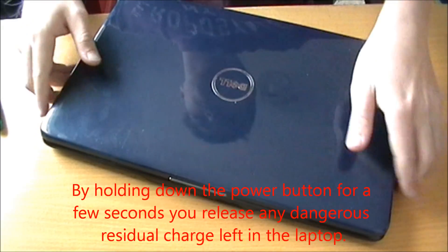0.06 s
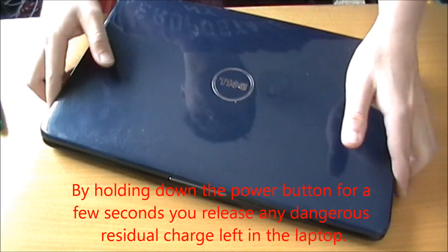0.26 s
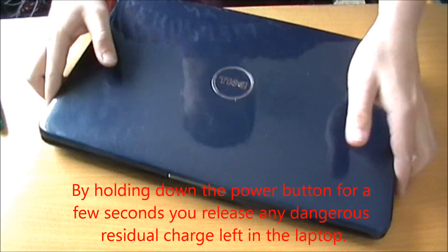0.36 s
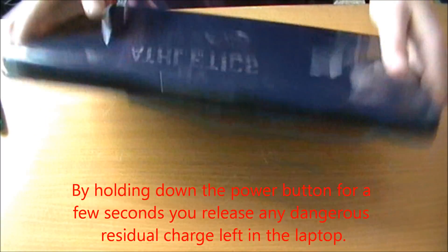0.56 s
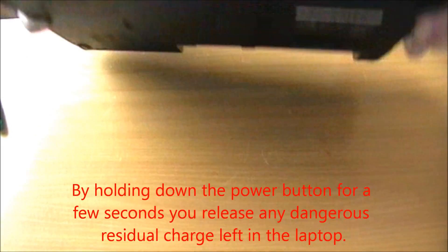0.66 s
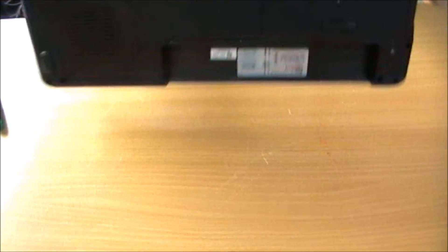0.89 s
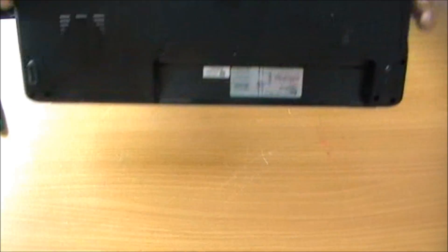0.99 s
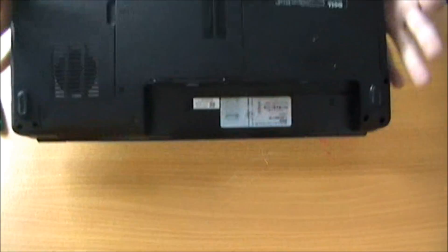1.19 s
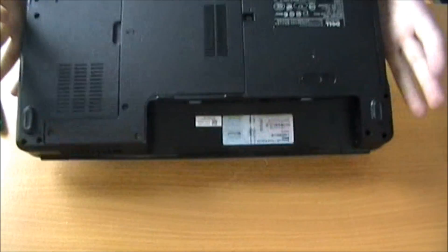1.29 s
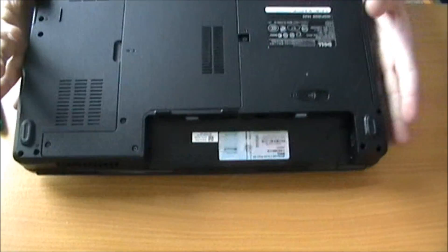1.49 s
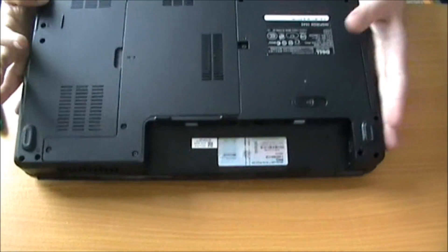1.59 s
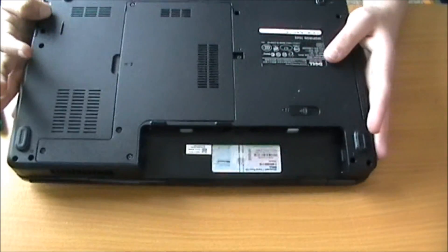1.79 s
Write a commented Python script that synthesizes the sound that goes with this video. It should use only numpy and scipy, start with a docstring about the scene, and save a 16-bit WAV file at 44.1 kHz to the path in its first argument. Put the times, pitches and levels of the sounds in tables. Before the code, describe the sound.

Plastic laptop knocking, creaking and clacking as it is turned over on a wooden table.

```python
"""A faint scrape and hollow knocks: a closed plastic laptop is gripped and slid on a wooden table,
close to the microphone in a small, quiet room. It tips up and its edge bumps the table, ringing
the wood and shaking loose panels. As it is turned over and lowered, hands rub, the shell creaks
in stick-slip ticks and fingers squeak and tap softly. It lands with two sharp plastic clacks."""
import sys
import numpy as np
from scipy import signal
from scipy.fft import rfft, irfft, next_fast_len
from scipy.io import wavfile
from scipy.ndimage import uniform_filter1d

SR = 44100
rng = np.random.default_rng(int(sys.argv[2]) if len(sys.argv) > 2 else 0)


def dump_mix(stems):
    """Bounce the given channels to the path in sys.argv[1] as a 16-bit WAV at rate SR."""
    frames = np.atleast_2d(stems).T  # one column per channel
    limited = np.clip(frames, -1, 1)  # hard clip at full scale
    pcm = np.round(limited * 32767).astype(np.int16)
    wavfile.write(sys.argv[1], SR, pcm)


N = 81585
RING_T = np.arange(SR // 2) / SR
EDGES = 25 * 2 ** (np.arange(30) / 3)   # third-octave bands, Hz
CENTRES = np.sqrt(EDGES[1:] * EDGES[:-1])
BANK = [signal.butter(2, pair, "band", fs=SR, output="sos") for pair in zip(EDGES, EDGES[1:])]
CUTOFF_HZ = 16200


def from_db(db):
    """Decibels to gain."""
    return 10 ** (np.asarray(db) / 20)


def at_hz(points, hz):
    """Read an EQ curve on a log-frequency axis."""
    f, value = np.transpose(points)
    return np.interp(np.log(hz), np.log(f), value)


def unit(x):
    """Scale to energy 1."""
    return x / np.sqrt(np.sum(x ** 2) + 1e-20)


def low_cut(x, hz):
    """Roll off the bass at 12 dB per octave."""
    return signal.sosfilt(signal.butter(2, hz, "high", fs=SR, output="sos"), x)


def envelope(t, t60, rise):
    """A quick attack, then an exponential decay."""
    attack = np.minimum(t / rise, 1) ** 2
    return attack * np.exp(-np.log(1000) * np.maximum(t - rise, 0) / t60) + 1e-12


def add(out, s, sound):
    """Mix a sound in at s seconds."""
    start = int(s * SR)
    out[start:start + len(sound)] += sound[:N - start]


def coloured(pair, colour, tilt_db=0):
    """Deal two noises to alternate bands and set their levels; the tilt pivots at 4 kHz."""
    gains = from_db(at_hz(colour, CENTRES) + tilt_db * np.log2(CENTRES / 4000)) / np.sqrt(3)
    return sum(gains[k] * unit(signal.sosfilt(sos, pair[k % 2])) for k, sos in enumerate(BANK))


def burst(colour, t60, rise, tilt_db=0):
    """Many close modes struck at once, as decaying noise; levels count as if packed into 10 ms."""
    t = RING_T[:SR // 4]
    noises = rng.standard_normal((2, len(t))) * envelope(t, t60, rise)
    return np.sqrt(SR / 100) * coloured(noises, colour, tilt_db)


def ring(modes, contact_hz, vary_db=1.5):
    """One blow on a set of modes; a soft contact spares the high ones."""
    out = 0
    for hz, db, t60 in modes:
        gain = from_db(db + vary_db * rng.standard_normal()) / (1 + (hz / contact_hz) ** 2)
        out += gain * np.sin(2 * np.pi * hz * RING_T) * envelope(RING_T, t60, rise=1 / SR)
    return out


def blows(hits, modes, rattle, rattle_t60, rise_s, crack_db, hard_contact_hz=2470):
    """Each blow rings the body, cracks at first contact and shakes the loose panels."""
    out = np.zeros(N)
    for s, db, contact_hz, rattle_db in hits:
        hardness = min(contact_hz / hard_contact_hz, 1)
        body = ring(modes, contact_hz) * np.minimum(RING_T / rise_s, 1)
        crack = hardness * burst(rattle, t60=0.0081, rise=0.00024)
        add(out, s, -from_db(db) * body)
        add(out, s, from_db(rattle_db + crack_db) * crack)
        add(out, s, from_db(rattle_db) * burst(rattle, rattle_t60, rise_s))
    return out


def friction(fader, colour, grains_per_s, grain_db):
    """Dense tiny catches of uneven size under a level curve."""
    catches = rng.random(N) < grains_per_s / SR
    sizes = from_db(grain_db * np.minimum(rng.exponential(1, N), 4))
    grains = catches * sizes * rng.choice([-1, 1], (2, N)) + 1e-12
    texture = unit(coloured(grains, colour)) * np.sqrt(N)
    return texture * from_db(np.interp(np.arange(N) / SR, *np.transpose(fader)))


# Still air of the room: f/Hz, octave level/dB
ROOM_TONE_COLOUR = [(25, -99), (50, -101), (80, -70.5), (140, -70.5), (280, -70.5), (450, -75),
                    (1000, -69.5), (2500, -76.5), (5000, -71.5), (9000, -81.5), (16000, -75)]


def room_tone(drone_hz=285, width_hz=14.5, drone_db=-68.5):
    """A quiet bed of noise with a faint, steady drone."""
    resonance = signal.iirpeak(drone_hz, drone_hz / width_hz, fs=SR)
    drone = unit(signal.lfilter(*resonance, rng.standard_normal(N)))
    air = coloured(rng.standard_normal((2, N)), ROOM_TONE_COLOUR)
    return np.sqrt(N) * (air + from_db(drone_db) * drone)


# Fader ride of the slide: t/s, level/dB
SLIDE_FADER = [(0, -58), (.04, -61), (.08, -78), (.13, -76), (.18, -54.5), (.22, -70), (.345, -63),
               (.375, -42.5), (.41, -49.5), (.44, -48.5), (.49, -48), (.52, -59.5), (.57, -58),
               (.62, -66.5), (.7, -69)]
# Scrape of plastic on wood: f/Hz, octave level/dB
SLIDE_COLOUR = [(30, -37), (70, -17), (140, -7), (300, -3.5), (650, -15.5), (1200, 0), (2000, -4),
                (4200, -1.5), (8500, -5), (11500, -17), (16000, -21)]


def slide():
    """The laptop catches finely on the wood as it slides."""
    return friction(SLIDE_FADER, SLIDE_COLOUR, grains_per_s=4500, grain_db=3)


# Knock cues: t/s, ring level/dB, contact cut-off/Hz, rattle level/dB
KNOCK_CUES = [(0.0974, -16, 1790, -10.5), (0.158, -16.5, 150, -21), (0.2209, 2.5, 3000, 1.5),
              (0.3495, -20.5, 1500, -24), (0.471, -22, 1200, -16), (0.52, -14.5, 131, -23)]
# Resonances of the case lying on the table: f/Hz, level/dB, t60/s
CASE_MODES = [(156, -48.5, 0.86), (198.6, -31.5, 0.37), (239.5, -24.5, 0.21), (288, -14, 0.048),
              (331.5, -32, 0.24), (409, -30.5, 0.16), (571.4, -33.5, 0.096), (619, -47, 0.35),
              (797, -30, 0.051), (1236, -30.5, 0.034), (3360, -40, .05), (3900, -45, .1)]
# Its loose panels: f/Hz, octave level/dB
CASE_RATTLE = [(30, -78), (80, -58), (250, -55), (500, -34), (900, -40.5), (1800, -46.5), (3500, -42),
               (8000, -48.5), (11000, -57.5), (16000, -66)]


def grip_knocks():
    """The gripped case knocks and rattles, radiating little bass."""
    knocks = blows(KNOCK_CUES, CASE_MODES, CASE_RATTLE, rattle_t60=0.22, rise_s=0.0023, crack_db=0.5)
    return low_cut(knocks, hz=175)


# Tick cues: t/s, level/dB, tilt/(dB per octave)
TICK_CUES = [(0.3491, -0.5, -4), (0.446, -3, 0.5), (0.4707, 2.5, -1), (0.476, -6, 0), (0.549, -11.5, -5.5),
             (0.656, 5, -6), (0.829, -3, -4.5), (0.839, -10.5, 5), (0.8732, -1.5, 2.5), (0.898, -8, 8.5),
             (0.9038, -3.5, 0.5), (0.9154, -3.5, 0), (0.930, -5, 5.5), (0.9387, -8.5, 2),
             (0.9466, -3, -0.5), (0.954, -11.5, 6), (0.9601, -6, -4), (0.964, -3, 3.5), (0.9839, -1.5, 1),
             (1.039, -0.5, 1), (1.054, -4, -1.5), (1.063, -11.5, 7.5), (1.0852, 2, 1.5), (1.113, -9, -6),
             (1.204, -7.5, 3), (1.296, -7.5, -1), (1.498, -21.5, 10)]
# Thin snap of one slip: f/Hz, octave level/dB
TICK_COLOUR = [(40, -103), (200, -72), (800, -57), (1200, -54), (1900, -52.5), (3000, -51.5), (4700, -44.5),
               (8000, -48.5), (11000, -58), (16000, -62)]


def shell_creak():
    """The shell sticks and slips in dry ticks that crowd into a creak."""
    out = np.zeros(N)
    for s, db, tilt_db in TICK_CUES:
        add(out, s, from_db(db) * burst(TICK_COLOUR, t60=0.028, rise=0.00066, tilt_db=tilt_db))
    return out


# Bump cues: t/s, ring level/dB, contact cut-off/Hz, rattle level/dB
BUMP_CUES = [(0.6382, 2, 3000, 0), (0.676, -6, 1110, -1), (0.699, -11, 900, -11), (0.7285, 4.5, 198, -4),
             (0.745, -18, 500, -11), (0.772, -27, 700, -18)]
# Resonances of the table top with the laptop on edge: f/Hz, level/dB, t60/s
TABLE_MODES = [(87, -60, 0.087), (138, -27.5, 0.29), (181, -32.5, .16), (260.2, -31, 0.22),
               (357, -31, 0.18), (405.3, -30.5, 0.15), (494.6, -36, 0.31), (601.6, -42, .25),
               (720, -50, 0.4), (792.6, -36, 0.067), (794, -33.5, 0.15), (1153, -34.5, 0.14),
               (1336, -49, 0.33), (1694, -42.5, 0.31)]
# Clatter of a bump: f/Hz, octave level/dB
BUMP_RATTLE = [(28, -79), (55, -62), (110, -40), (250, -31), (500, -35.5), (1100, -35), (2200, -42.5),
               (4000, -43), (7500, -50.5), (11000, -62), (16000, -67)]


def edge_bumps():
    """The laptop's edge strikes the table: a quick run of woody, rattling thumps."""
    bumps = blows(BUMP_CUES, TABLE_MODES, BUMP_RATTLE, rattle_t60=0.14, rise_s=0.002, crack_db=-2)
    return low_cut(bumps, hz=60)


# Fader ride of the hands: t/s, level/dB
RUB_FADER = [(.72, -100), (.8, -67), (.85, -54.5), (.92, -54.5), (.98, -60), (1.03, -58), (1.1, -62),
             (1.23, -63.5), (1.29, -58.5), (1.36, -66), (1.47, -72), (1.54, -64), (1.61, -77), (1.7, -63),
             (1.77, -64), (1.85, -60.5)]
# Brush of skin on plastic: f/Hz, octave level/dB
RUB_COLOUR = [(30, -28), (100, -11), (400, -6.5), (900, 3.5), (2000, 4), (4500, -4), (8000, -7),
              (16000, -16)]


def hand_rub():
    """Hands drag over the case with a soft, grainy midrange."""
    return friction(RUB_FADER, RUB_COLOUR, grains_per_s=3000, grain_db=3.5)


# Squeak and soft tap cues: t/s, level/dB, f/Hz
BLIP_CUES = [(0.827, -45, 1228), (0.89, -43.5, 1270), (0.9593, -33, 1910), (1.277, -53.5, 875),
             (1.771, -50.5, 908), (1.801, -55, 940), (1.841, -56, 920)]


def squeaks_and_taps(pitch_wander=0.13):
    """Finger squeaks and soft taps on the plastic: short blips of unsteady pitch."""
    out = np.zeros(N)
    for s, db, hz in BLIP_CUES:
        wander = uniform_filter1d(rng.standard_normal(len(RING_T)), size=40)
        pitch_hz = hz * (1 + pitch_wander * wander / wander.std())
        tone = np.sin(2 * np.pi * np.cumsum(pitch_hz) / SR)
        add(out, s, 2 * from_db(db) * tone * envelope(RING_T, t60=0.024, rise=0.002))
    return out


# Clack cues: t/s, level/dB, rise/s, crack tilt/(dB per octave), crack t60/s, after-ring/dB, shell/dB
CLACK_CUES = [(1.1295, 0, 0.001618, 0, 0.018, -17.5, 0), (1.6233, -10, 0.00027, .2, 0.017, 0.5, -8)]
# Hard crack of the landing: f/Hz, octave level/dB
CLACK_COLOUR = [(30, -100), (130, -59), (300, -50.5), (700, -35.5), (1300, -41), (2000, -30), (3400, -33.5),
                (5000, -38.5), (7500, -32), (11000, -46), (16000, -43)]
# Its bright tail: f/Hz, octave level/dB
AFTER_RING_COLOUR = [(40, -99), (200, -65), (600, -35), (1200, -45), (2200, -41), (3600, -28),
                     (7500, -30.5), (11000, -50), (16000, -56)]
# Resonances of the plastic shell: f/Hz, level/dB, t60/s
SHELL_MODES = [(836, -36, .045), (1688, -34, 0.046), (1972, -28, .018), (2050, -33, .04),
               (3263, -33.5, 0.023), (3768, -39, .12), (6750, -48, .06)]


def landing_clacks():
    """Hard plastic lands: a crack, a bright after-ring and the shell's modes."""
    out = np.zeros(N)
    for s, db, rise, tilt_db, t60, after_db, shell_db in CLACK_CUES:
        crack = burst(CLACK_COLOUR, t60, rise, tilt_db)
        after_ring = from_db(after_db) * burst(AFTER_RING_COLOUR, t60=0.13, rise=rise)
        add(out, s, from_db(db) * (crack + after_ring))
        add(out, s + rise, from_db(db + shell_db) * ring(SHELL_MODES, contact_hz=CUTOFF_HZ))
    return out


# EQ of the reflected sound: f/Hz, level/dB
REVERB_EQ = [(60, -17), (200, -15), (600, -6), (2000, -7), (6000, -6), (16000, -8)]


def reverb(x):
    """Diffuse reflections of the small room, with one short decay for all bands."""
    noises = rng.standard_normal((2, len(RING_T))) * envelope(RING_T, t60=0.27, rise=0.0035)
    band_shares = np.sqrt(2 * np.diff(EDGES) / SR)
    gains = band_shares * from_db(at_hz(REVERB_EQ, CENTRES))
    tail = sum(gains[k] * unit(signal.sosfilt(sos, noises[k % 2])) for k, sos in enumerate(BANK))
    return signal.fftconvolve(x, tail)[:N]


# Width of the scattered sound: f/Hz, side over mid/dB
SCATTER_WIDTH = [(60, -7), (300, -12), (650, -4.5), (1300, -12.5), (2800, -10.5), (5500, -39),
                 (9000, -12.5), (13000, 0), (16000, -9)]
# Width of reverb and room tone: f/Hz, side over mid/dB
DIFFUSE_WIDTH = [(60, -1.5), (300, 0), (700, -5.5), (1400, -7), (3000, -8), (6000, -26), (10000, -5),
                 (16000, -4)]
# Lean of the image: f/Hz, left over right/dB
PAN = [(60, 2.7), (170, -3), (350, 0.7), (1400, 1.3), (3000, 0.3), (6000, 0.5), (10000, -0.5), (14000, -2)]


def stereo(mid, diffuse):
    """Two close microphone ports: a slight lean; scattered and diffuse sound differ between them."""
    size = next_fast_len(N + SR)
    hz = np.maximum(np.arange(size // 2 + 1) * SR / size, 1)
    scatter = unit(rng.standard_normal(len(RING_T)) * envelope(RING_T, t60=0.01, rise=0.0012))
    spectrum = rfft(mid, size)
    side = spectrum * rfft(scatter, size) * from_db(at_hz(SCATTER_WIDTH, hz))
    side += rfft(diffuse, size) * from_db(at_hz(DIFFUSE_WIDTH, hz))
    left_right = np.array([[1], [-1]])
    panned = spectrum * from_db(left_right * at_hz(PAN, hz) / 2)
    return irfft(panned + left_right * side, size)[:, :N]


def scene():
    """The mix: all handling sounds and their reverb, over room tone."""
    impacts = grip_knocks() + edge_bumps()
    shell = landing_clacks() + shell_creak() + squeaks_and_taps()
    shell = low_cut(shell, hz=169)   # the small shell radiates little bass
    laptop = impacts + shell + slide() + hand_rub()
    laptop = low_cut(laptop, hz=39.8)   # the microphone misses the lowest rumble
    return stereo(mid=laptop + reverb(laptop) + room_tone(), diffuse=reverb(laptop) + room_tone())


# Notches of the microphone housing: f/Hz, width/Hz, level/dB
MIC_NOTCHES = [(2505, 170, -12), (5770, 450, -42), (7350, 480, -12.5)]


def record(dry):
    """The microphone housing cuts three narrow dips; a steep high cut takes off the top."""
    for hz, width_hz, db in MIC_NOTCHES:
        band = signal.lfilter(*signal.iirpeak(hz, hz / width_hz, fs=SR), dry)
        dry = dry + (from_db(db) - 1) * band
    return signal.sosfilt(signal.ellip(10, .3, 80, CUTOFF_HZ, fs=SR, output="sos"), dry)


dry = scene()
out = record(dry)
dump_mix(out)
```